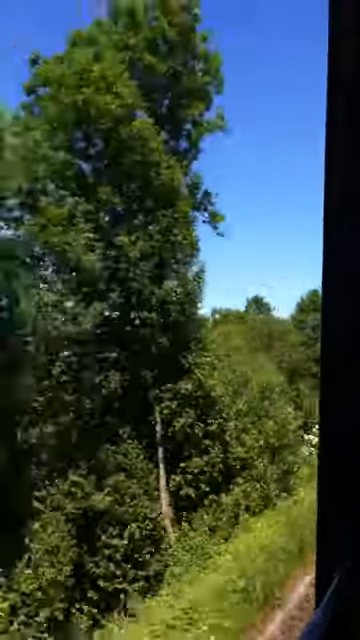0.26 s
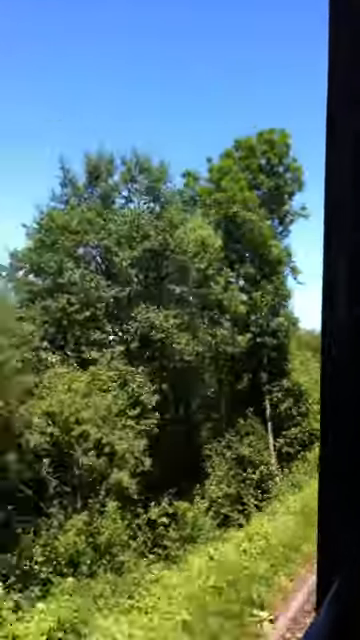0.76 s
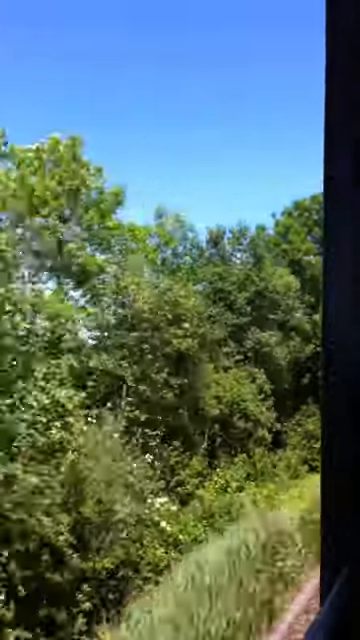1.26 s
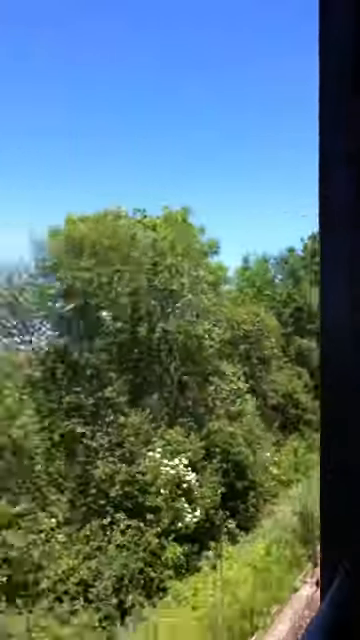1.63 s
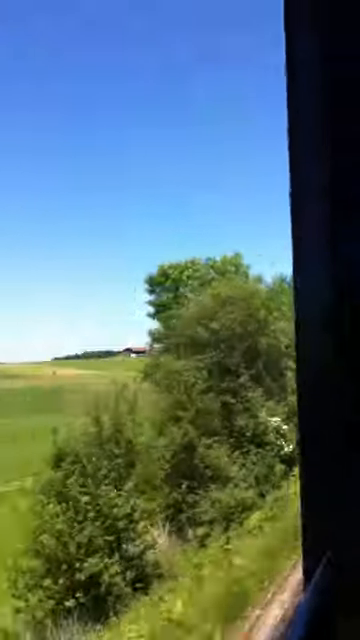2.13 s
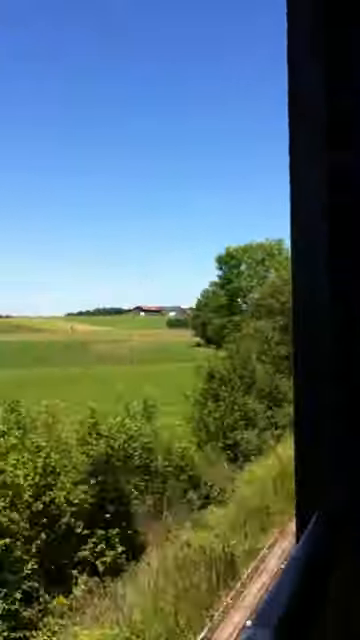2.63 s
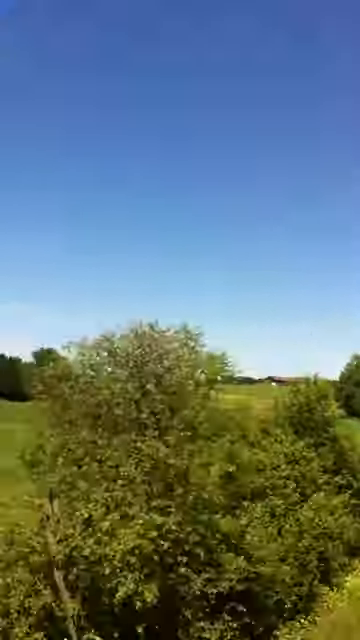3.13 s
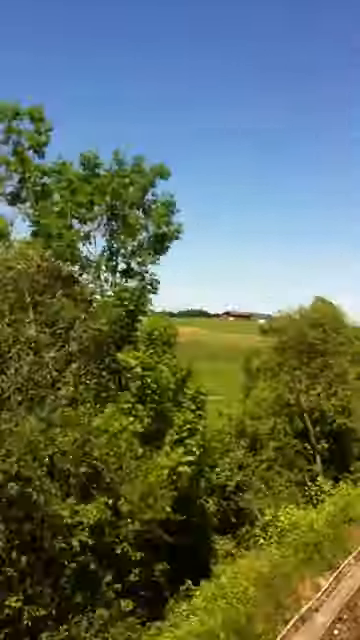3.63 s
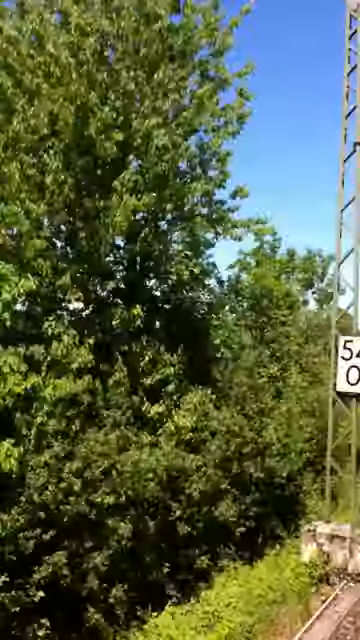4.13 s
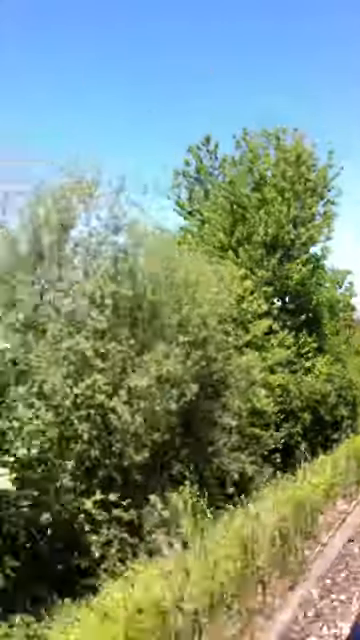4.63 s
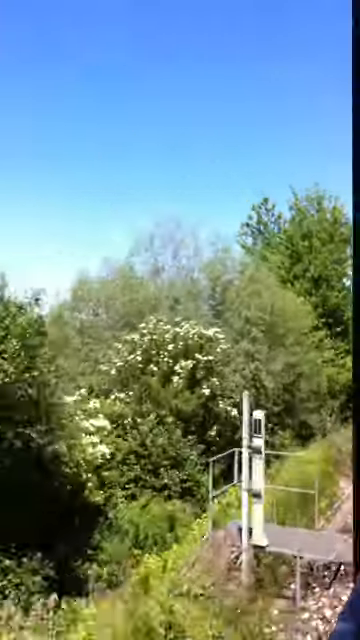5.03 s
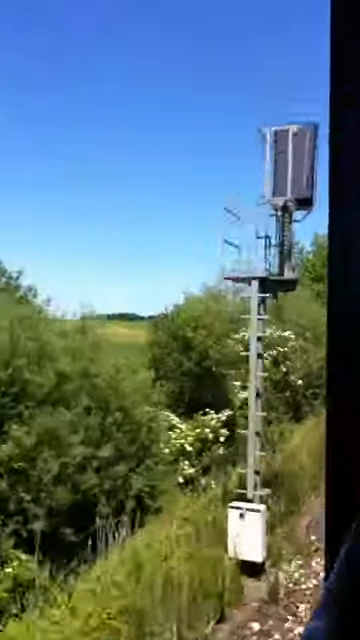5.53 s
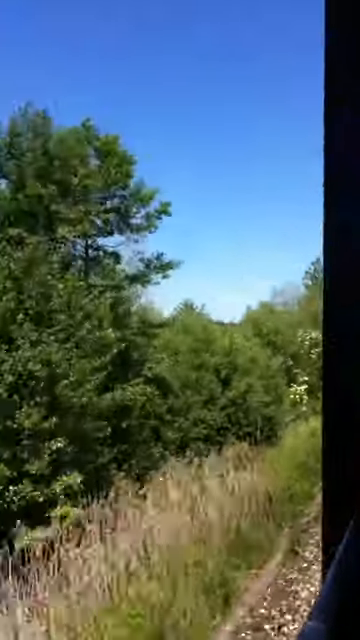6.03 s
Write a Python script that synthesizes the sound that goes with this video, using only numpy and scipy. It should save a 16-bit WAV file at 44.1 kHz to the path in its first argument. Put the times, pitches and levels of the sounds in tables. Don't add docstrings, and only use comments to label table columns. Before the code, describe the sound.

At the open window of a moving train, a phone microphone takes in wheel roar and hissing slipstream. Soft low thumps come first, then a hard slam that briefly ducks the background. A calmer stretch follows, before repeated heavy gusts thud and crackle through the second half, ending in several sharp, overloaded bursts.

```python
import sys
import numpy as np
from scipy import signal
from scipy.fft import rfft, irfft, next_fast_len
from scipy.io import wavfile
from scipy.ndimage import uniform_filter1d, minimum_filter1d, map_coordinates

SR = 44100
rng = np.random.default_rng(int(sys.argv[2]) if len(sys.argv) > 2 else 0)


def decibels_to_gain(level_db):
    exponent = np.asarray(level_db, float) / 20
    return 10 ** exponent


def generate_wav(signal):
    frames = np.transpose(np.atleast_2d(signal))
    scaled = np.clip(frames, -1, 1) * 32767
    pcm = np.round(scaled).astype(np.int16)
    wavfile.write(sys.argv[1], SR, pcm)


N = 276948


def unit(x):
    return x / np.sqrt(np.mean(x ** 2) + 1e-20)


def along(points, hz):
    f, v = np.transpose(points)
    return np.interp(np.log(hz + 1), np.log(f + 1), v)


def wobble(rate):
    return map_coordinates(rng.standard_normal(400), [np.arange(N) * rate / SR])


def rush(spectrum, patchy_db, humps=()):
    z = signal.stft(rng.standard_normal(N), nperseg=512)[2]
    field = uniform_filter1d(rng.standard_normal(z.shape), size=5, axis=0)
    field = uniform_filter1d(field, size=10, axis=1)
    x = signal.istft(z * decibels_to_gain(patchy_db * unit(field)), nperseg=512)[1][:N]
    m = next_fast_len(N + 8192)
    hz = np.fft.rfftfreq(m, 1 / SR)
    lift = sum(db / (1 + (2 * (hz - centre) / width) ** 2) for centre, width, db in humps)
    return unit(irfft(rfft(x, m) * decibels_to_gain(along(spectrum, hz) + lift), m)[:N])


def self_noise():
    # (frequency [Hz], level [dB per Hz])
    amplifier_spectrum = [(1000, -20), (4000, -10), (9000, -4), (16000, -6)]
    return decibels_to_gain(-69) * rush(amplifier_spectrum, patchy_db=3.0)


def gear_whine():
    # (frequency [Hz], peak level [dB])
    gear_tones = [
        (3455, -75),
        (3626, -71),
    ]
    t = np.arange(N) / SR
    return sum(decibels_to_gain(db + 2 * wobble(5)) * np.sin(2 * np.pi * hz * t + 3 * wobble(23))
               for hz, db in gear_tones)


def track_rush(stream_db, flutter):
    # (frequency [Hz], level [dB per Hz])
    track_spectrum = [(600, -60), (1500, -8), (2400, -1.5), (2900, -0.5), (3500, 2), (4500, -3), (6000, -9),
                      (9000, -28.5), (14000, -69)]
    level_db = -43.5 + 0.4 * stream_db + 0.067 * flutter + 0.71 * wobble(15)
    return decibels_to_gain(level_db) * rush(track_spectrum, patchy_db=0.9)


def wheel_roar(stream_db, lumps, flutter):
    # (frequency [Hz], level [dB per Hz])
    roar_spectrum = [(40, -72), (100, -29.5), (250, -3.5), (400, -5.5), (800, -8), (1300, -9.5),
                     (2200, -16), (2700, -28.5), (4000, -75), (8000, -94)]
    # (frequency [Hz], width [Hz], lift [dB])
    rail_modes = [
        (528, 170, 4.5),
        (994, 264, 5.5),
        (1866, 160, 2.5),
    ]
    level_db = -29.5 + 0.22 * stream_db + 0.64 * lumps + 0.1 * flutter
    return decibels_to_gain(level_db) * rush(roar_spectrum, patchy_db=1.5, humps=rail_modes)


def slipstream_hiss(hiss_db, flutter):
    # (frequency [Hz], level [dB per Hz])
    hiss_spectrum = [(3000, -3), (5000, 2), (6500, 0), (8500, -2), (10500, -7), (13000, -13), (16000, -29)]
    level_db = hiss_db + 0.075 * flutter + 0.099 * wobble(19)
    return decibels_to_gain(level_db) * rush(hiss_spectrum, patchy_db=1.25)


def port_air(stream_db):
    # (frequency [Hz], level [dB per Hz])
    port_spectrum = [(7000, -24), (10000, 2), (12500, -0.5), (14000, 1), (15000, -2), (16000, -7)]
    return decibels_to_gain(-56.6 + 0.64 * stream_db) * rush(port_spectrum, patchy_db=1.0)


def buffeting(buffet_db, lumps):
    # (frequency [Hz], level [dB per Hz])
    buffet_spectrum = [(20, -23), (40, -10), (70, -4.5), (110, 2), (160, 5), (250, -4.5), (400, -6),
                       (800, -38.5), (2500, -84)]
    gusty = decibels_to_gain(4.2 * lumps + 5.9 * wobble(6.2)) * rush(buffet_spectrum, patchy_db=1.75)
    return decibels_to_gain(buffet_db) * unit(gusty)


def running():
    # (time [s], turbulence on the port [dB], slipstream strength [dB])
    wind_course = [(0, -32, -48), (.2, -38.5, -49), (.5, -28, -47.5), (.8, -34.5, -48),
                   (1.05, -26.5, -45.5), (1.5, -40.5, -50.5), (2.2, -37.5, -52), (2.8, -33.5, -49),
                   (3.14, -40, -48), (3.41, -23.5, -44), (3.67, -32, -47.5), (3.93, -20.5, -43),
                   (4.19, -39.5, -47.5), (4.45, -24, -46), (4.72, -36, -47), (4.98, -32.5, -47.5),
                   (5.5, -26.5, -48), (6.29, -25, -49.5)]
    s, *columns = np.transpose(wind_course)
    t = np.arange(N) / SR
    buffet_db, hiss_db = (np.interp(t, s, column) for column in columns)
    stream_db = hiss_db - hiss_db.mean()
    lumps, flutter = wobble(28), wobble(12)
    air = gear_whine() + track_rush(stream_db, flutter)
    air += wheel_roar(stream_db, lumps, flutter)
    air += slipstream_hiss(hiss_db, flutter) + port_air(stream_db)
    return air + buffeting(buffet_db, lumps)


def frame_echo(x):
    # (time [s], extra path [mm], depth [dB])
    frame_path = [(0, 48, 1), (.9, 51, 1.5), (1.65, 69, 3), (1.9, 26, 2.5), (2.75, 31, 1.5), (3.1, 19.4, 3),
                  (3.8, 16, 0.5), (4.1, 21.5, 2), (4.45, 28, 2), (4.7, 35, 2), (5.2, 59, 2), (5.65, 68, 3),
                  (6.28, 70, .6)]
    echo_above_hz, blur_turns = 6000, 1.56
    hz, t, z = signal.stft(x, SR, nperseg=512)
    s, mm, depth_db = np.transpose(frame_path)
    turns = np.outer(hz, np.interp(t, s, mm) / 343000)
    ripple = -np.cos(2 * np.pi * turns) * np.exp(-(turns / blur_turns) ** 4)
    ripple /= 1 + (echo_above_hz / (hz[:, None] + 1)) ** 4
    return signal.istft(z * decibels_to_gain(np.interp(t, s, depth_db) * ripple), SR, nperseg=512)[1][:N]


def gain_control():
    # (time [s], drop [dB])
    gain_drops = [
        (0.746, 14.5),
        (3.433, 5),
        (4.667, 0.5),
        (5.536, 6.5),
        (5.842, 3.5),
        (6.064, 2),
        (6.122, 1.5),
    ]
    t, db = np.arange(N) / SR, np.zeros(N)
    for s, drop_db in gain_drops:
        since = np.clip(t - s, 0, None)
        attack = 1 - np.exp(-since / 0.0077)
        release = 0.19 * np.exp(-since / 0.0097) + 0.4 * np.exp(-since / 0.23) + 0.84 * np.exp(-since / 0.8)
        db -= drop_db * attack * release
    return decibels_to_gain(db)


def crackles():
    # (centre time [s], peak level [dB], top frequency [Hz], length [ms])
    torn_flow = [(.7425, -16, 3150, 4.8), (.741, -19, 1400, 6.8), (2.6, -29.5, 6000, 23),
                 (3.43, -11, 2900, 1.1), (3.4295, -20, 12500, 0.62), (3.432, -22, 6540, 4.2),
                 (3.4372, -23, 3800, 1.2), (3.654, -19, 2280, 2.8), (3.9205, -26, 5000, 1.6),
                 (3.92, -12, 1300, 1.6), (4.666, -15, 2100, 4.3), (5.534, -11, 2800, 3.6),
                 (5.535, -9.5, 3940, 2), (5.772, -24, 1300, 1.6), (5.842, -23, 2800, 1.6),
                 (6.0607, -11.5, 3030, 1.8), (6.063, -16.5, 6860, 1.9), (6.0675, -16.5, 4150, 1.1),
                 (6.1212, -26.5, 3780, 2.3)]
    air, t = np.zeros(N + SR), np.arange(-1024, 1024) / SR
    hz = np.fft.rfftfreq(len(t), 1 / SR)
    for s, db, top_hz, ms in torn_flow:
        burst = rng.standard_normal(len(t)) * np.exp(-2.8 * (t * 1000 / ms) ** 2)
        colour = (hz / top_hz) ** .5 / (1 + (hz / top_hz) ** 8)
        burst = irfft(rfft(burst) * colour)
        start = round((s + t[0]) * SR)
        air[start:][:len(t)] += decibels_to_gain(db) * burst / np.abs(burst).max()
    return air[:N]


def shed():
    # (first time [s], eddies [count], gap [s], peak level [dB], swing frequency [Hz])
    eddy_trains = [(1.212, 2, 0.033, -29, 210), (3.746, 2, .041, -17, 313), (4.612, 2, 0.017, -17.5, 295),
                   (4.964, 2, .011, -15.5, 220), (5.0181, 2, .019, -16, 143), (5.1862, 2, 0.062, -31, 181),
                   (5.3983, 4, 0.027, -19.5, 204), (5.5459, 3, .007, -17, 388),
                   (5.7053, 2, 0.021, -26, 310), (5.8932, 2, .008, -22.5, 590),
                   (5.9041, 3, 0.024, -22.5, 154), (6.1376, 4, 0.02, -25.5, 168),
                   (.048, 2, 0.064, -25, 168), (0.166, 2, 0.12, -28, 190), (3.5474, 2, .041, -26, 305),
                   (5.7495, 2, .018, -22.5, 202)]
    cycles, pitch_scatter, scatter_db = 1.41, 0.13, 3.5
    rows = np.array([(s + k * gap, db, hz, cycles)
                     for s, count, gap, db, hz in eddy_trains for k in range(round(count))])
    size, pitch = rng.standard_normal((len(rows), 2)).T
    rows[:, 1] += scatter_db * size
    rows[:, 2] *= np.exp(pitch_scatter * pitch)
    return rows


def swings(s, db, hz, cycles, phase):
    k = np.arange(-2048, 2048)
    u = k / SR * hz[:, None]
    bell = np.exp(-4 * np.log(2) * (u / cycles[:, None]) ** 2)
    wave = decibels_to_gain(db)[:, None] * bell * np.cos(2 * np.pi * u + phase[:, None])
    wave -= bell * wave.sum(1, keepdims=True) / bell.sum(1, keepdims=True)
    at = np.clip(np.round(s * SR).astype(int)[:, None] + k, 0, N)
    return np.bincount(at.ravel(), wave.ravel(), N + 1)[:N]


def eddies():
    # (centre time [s], peak level [dB], swing frequency [Hz], length [cycles])
    slams = [(.7329, -2.5, 285, 1), (.737, -7.5, 212, 2.54), (.7385, -6, 340, 2.86),
             (3.3972, -8.5, 140, 1.15), (3.43, -11, 217, 0.82), (3.651, -15, 161, 2.07),
             (3.66, -9.5, 209, 1.3), (3.923, -8, 169, 1.54), (3.9212, -14, 352, 0.85),
             (3.965, -12, 400, 1.5), (3.9703, -7, 201, 0.97), (4.518, -6, 169, 1.7),
             (4.662, -11, 370, 1.77), (4.664, -6, 201, 1.8), (4.665, -6.5, 286, 1.82),
             (4.681, -19.5, 178, 2.14), (5.5326, -1, 382, 1.75), (5.833, -5.5, 267, 1.46),
             (5.839, -4.5, 221, 2.55), (5.84, -10.5, 143, 1.65), (6.059, -9.5, 262, 0.79),
             (6.0733, -13, 180, 1.73), (6.1213, -6.5, 432, 2.65)]
    snaps = [(.7328, -6, 855, 2.25), (0.7396, -13.5, 1520, 3.3), (1.0878, -22.5, 400, 1),
             (2.5286, -20.4, 526, 2.2), (3.167, -17, 800, 1), (3.171, -16, 555, 3.3),
             (3.431, -3, 560, 1.18), (3.4376, -12.5, 587, 0.99), (3.6543, -9, 1250, 1.3),
             (3.6581, -6, 433, 1.2), (3.846, -20, 636, 1.4), (3.921, -5, 656, 1.35),
             (3.964, -14, 520, 1.96), (4.397, -18.5, 750, 1.3), (4.528, -17.5, 540, 5.4),
             (4.613, -16, 523, 2.1), (4.6667, -6, 800, 2.4), (5.0692, -18, 820, 1.6),
             (5.104, -22.5, 486, 2.3), (5.385, -20, 428, 1), (5.5384, -13, 760, 4.4), (5.834, -23, 900, 1),
             (5.8396, -6.5, 1280, 1.06), (5.8848, -17, 855, 0.94), (6.0629, -11, 2820, 3.9),
             (6.064, 15, 730, 0.81), (6.067, -18, 510, 1.9), (6.118, -13, 608, 0.71)]
    thumps = [(.2794, -16.5, 256, 1.3), (0.48, -18.5, 205, 1.7), (0.5586, -17, 184, 2.05),
              (0.7035, -14, 320, 1.2), (.752, -23, 194, 1.4), (1.1587, -18, 198, 1.6), (1.4, -19, 273, 1.4),
              (1.586, -26, 198, 1.16), (1.8851, -20.5, 190, 1.04), (2.535, -22, 131, 2.9),
              (2.5467, -17.5, 306, 2.2), (2.6438, -16, 147, 1.33), (3.1713, -21.5, 136, 1.7),
              (3.4898, -22, 188, 0.89), (3.5736, -13.5, 186, 1), (3.6806, -23, 168, 2.3),
              (3.851, -15.5, 206, 1.5), (3.8765, -16, 238, 2.1), (4.039, -20, 190, 1.9),
              (4.082, -13.5, 220, 1.9), (4.0912, -13, 255, 0.92), (4.3972, -14, 318, 1.9),
              (4.4543, -18, 269, 2), (4.8747, -13.5, 230, 1.97), (4.949, -13, 184, 1.8),
              (4.9949, -13, 280, 1.25), (5.075, -15, 177, 1.8), (5.3428, -19, 171, 1.75),
              (5.883, -20, 282, 2.7), (6.0045, -17, 167, 2)]
    fragment_db = [
        -10.5,
        -16,
        -13.5,
        -18.5,
    ]
    stiff_hz, stiff_db = 630, 14

    kinds = [slams, snaps, thumps, shed()]
    s, db, hz, cycles = np.vstack(kinds).T
    breakup_db = np.repeat(fragment_db, [len(kind) for kind in kinds])
    breakup_db = breakup_db - stiff_db * np.clip(np.log2(hz / stiff_hz), 0, None)
    luck = rng.random((len(s), 11))
    air = swings(s, db, hz, cycles, 2 * np.pi * luck[:, 0])
    air += swings(s + 0.25 * cycles / hz, db - 10, hz * 0.65, 0.88 * cycles, 2 * np.pi * luck[:, 1])
    for step, (ratio, offset_db) in enumerate([(1.6, 5.3), (2.4, 8.1), (3.4, 2.5)]):
        shift, spread, phase = luck[:, 2 + 3 * step:5 + 3 * step].T
        when = s + 0.847 * (shift - .5) * cycles / hz
        fragment_hz = hz * ratio * (0.89 + 0.28 * spread)
        air += swings(when, db + breakup_db + offset_db, fragment_hz, 0.93 + 0 * s, 2 * np.pi * phase)
    return air


def scene():
    air = gain_control() * frame_echo(running())
    air += crackles() + eddies()
    return (air + self_noise())[None]


def starve(x):
    # (centre time [s], length [s], lower edge [Hz])
    treble_holes = [
        (0.74, .008, 9400),
        (0.753, 0.015, 4000),
        (3.446, 0.015, 8400),
        (5.536, 0.0049, 6000),
        (6.065, 0.0065, 6100),
    ]
    t, hz = np.arange(N) / SR, np.fft.rfftfreq(N, 1 / SR)
    spectrum = rfft(x)
    holes = 0
    for s, length, above_hz in treble_holes:
        holes = holes + np.exp(-(2 * (t - s) / length) ** 4) * irfft(spectrum * (hz > above_hz), N)
    return x - .96 * holes


def thin_out(x, size=1024):
    # (frequency [Hz], share [1])
    lost_share = [(1500, 0), (2600, .015), (4700, .02), (6900, .045), (9600, .085), (12000, .12),
                  (14000, .13), (15500, .2)]
    frame_offset = 105
    n, k = np.arange(2 * size), np.arange(size)
    window = np.sin(np.pi * (n + .5) / (2 * size)) * np.sqrt(2 / size)
    basis = window[:, None] * np.cos(np.pi / size * np.outer(n + .5 + size / 2, k + .5))
    lead = 2 * size - frame_offset
    halves = np.pad(x, (lead, 3 * size - (lead + N) % size)).reshape(-1, size)
    blocks = np.hstack([halves[:-1], halves[1:]])
    lines = blocks @ basis
    power = uniform_filter1d(lines ** 2, size=2, axis=0)
    nearby = uniform_filter1d(power, size=9, axis=1)
    strength = np.abs(nearby / (uniform_filter1d(power, size=101, axis=1) + 1e-20))
    strength[np.abs(blocks).max(1) > .3] = np.inf
    rank = strength.argsort(0).argsort(0) / len(lines)
    kept = rank >= along(lost_share, (k + .5) * SR / 2 / size)
    frames = (lines * kept) @ basis.T
    return (frames[1:, :size] + frames[:-1, size:]).ravel()[lead - size:][:N]


def roll_off(x):
    return signal.sosfilt(signal.butter(12, 15780, fs=SR, output="sos"), x)


def record(dry):
    low_cut_hz, top_hz, ceiling = 50, 15780, .705
    dry = signal.sosfilt(signal.butter(2, low_cut_hz, "high", fs=SR, output="sos"), dry)
    need = np.minimum(1, ceiling / (np.abs(dry) + 1e-9))
    held = dry * uniform_filter1d(minimum_filter1d(need, size=61), size=31)
    held = irfft(rfft(held) * (np.fft.rfftfreq(N, 1 / SR) < top_hz), N)
    mix = thin_out(starve(held)[0])[None]
    return roll_off(mix)


dry = scene()
out = record(dry)
generate_wav(out)
```